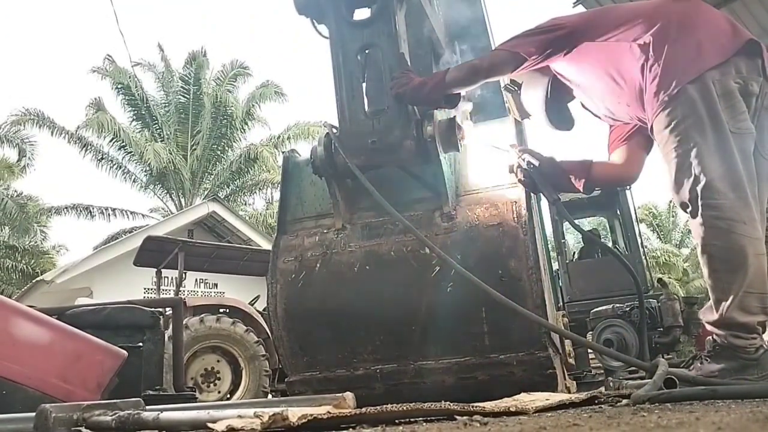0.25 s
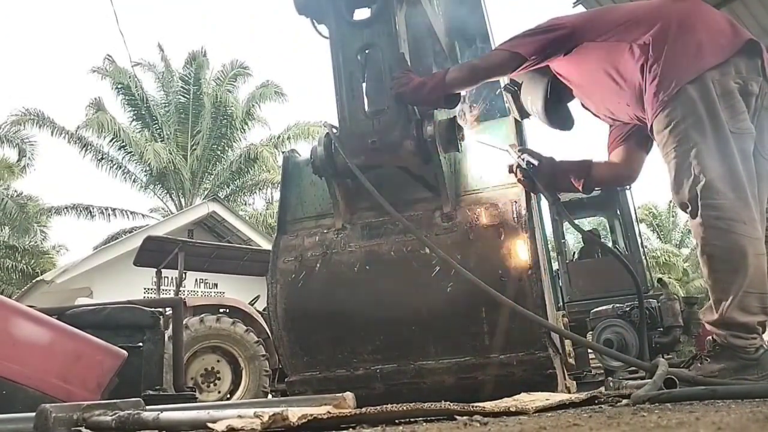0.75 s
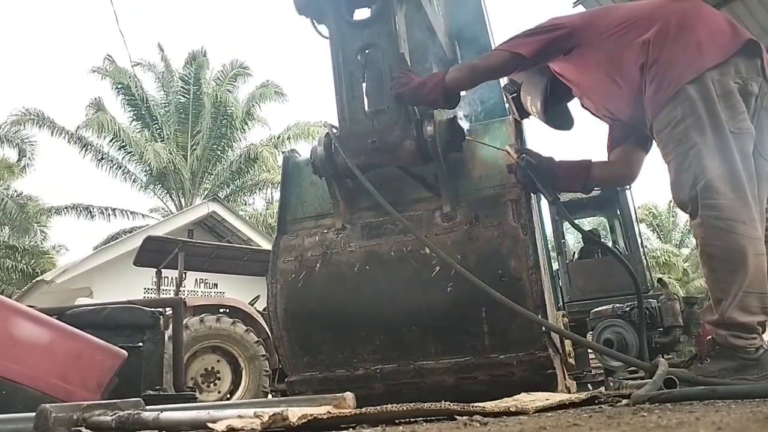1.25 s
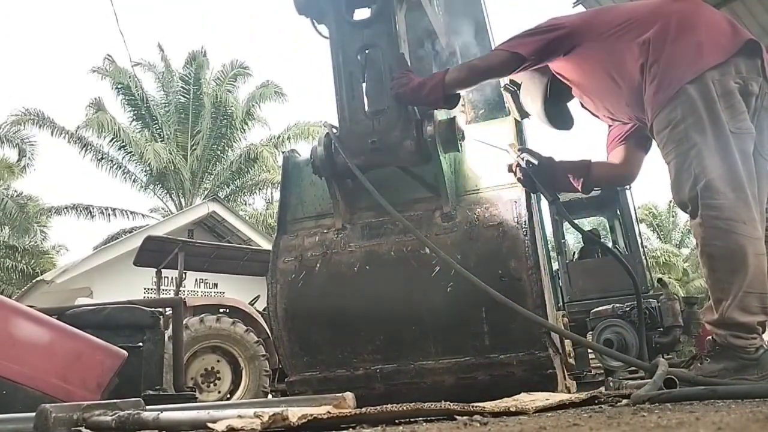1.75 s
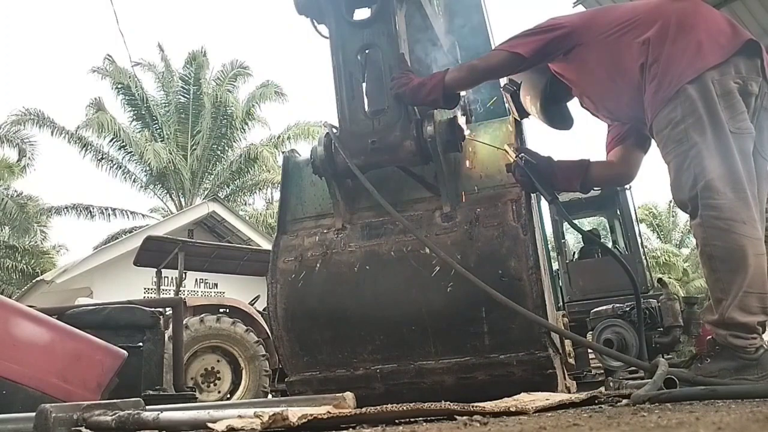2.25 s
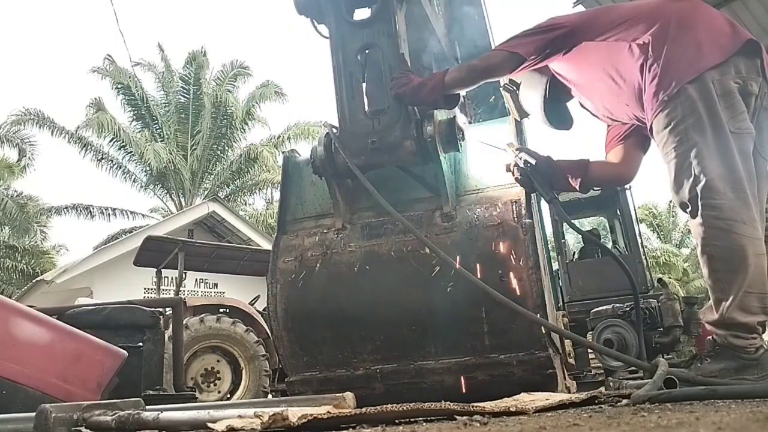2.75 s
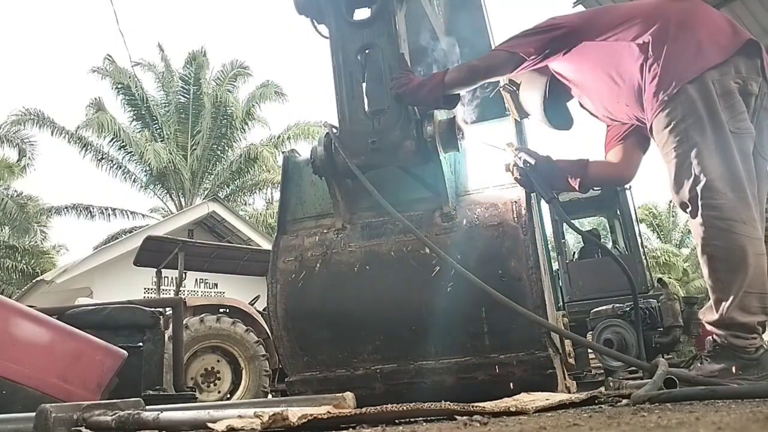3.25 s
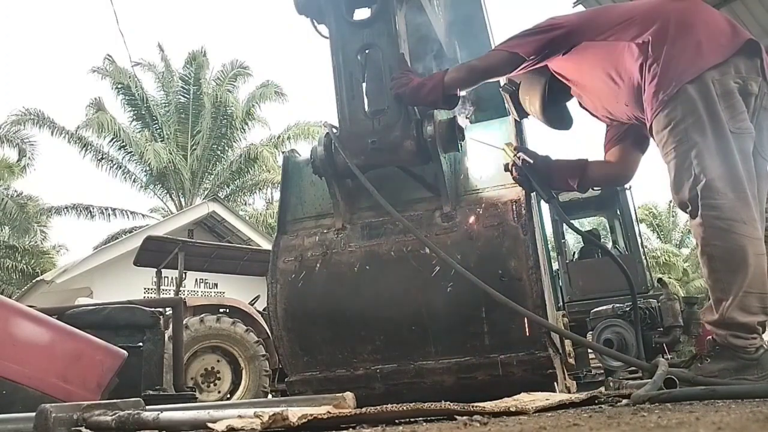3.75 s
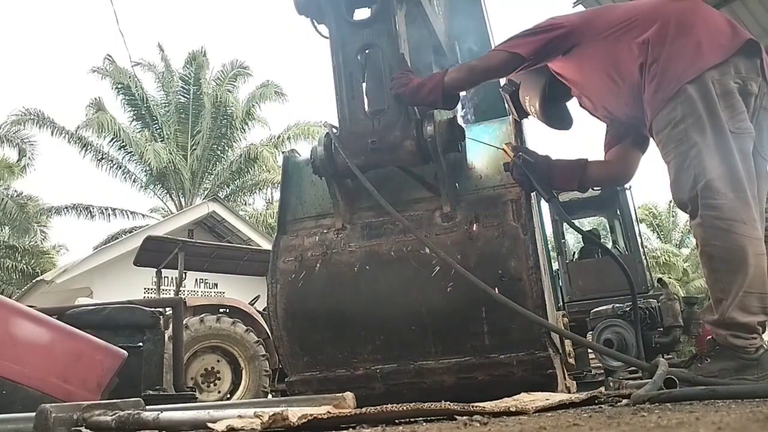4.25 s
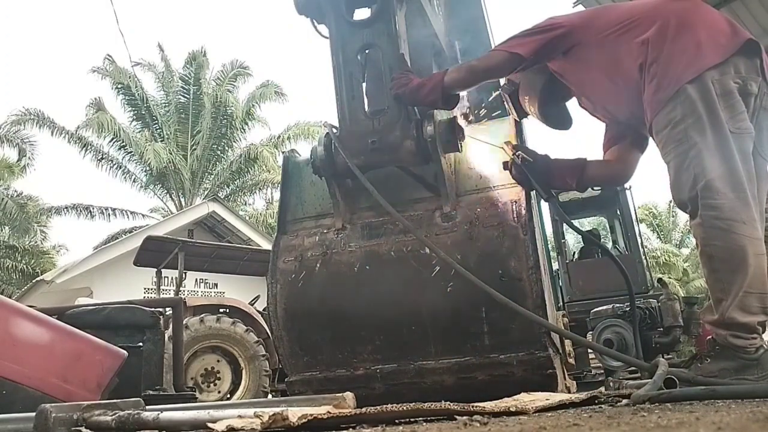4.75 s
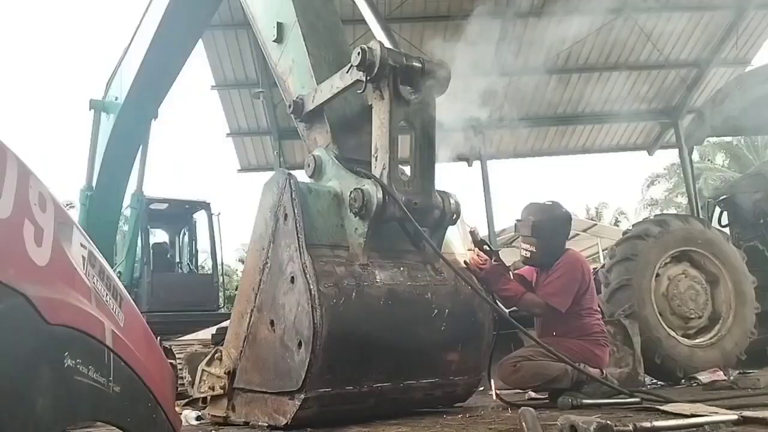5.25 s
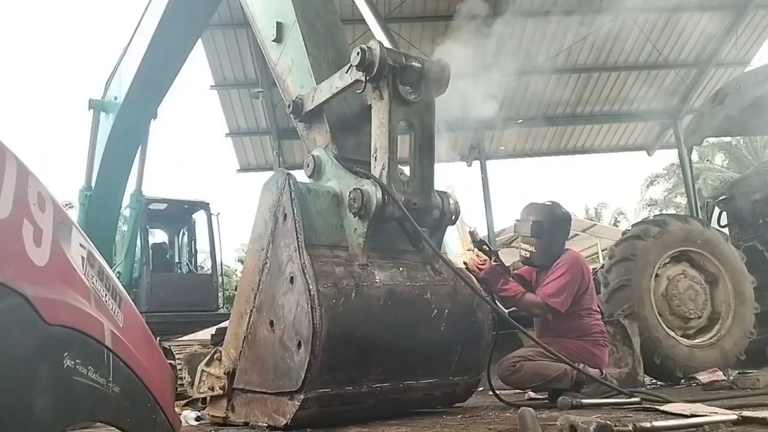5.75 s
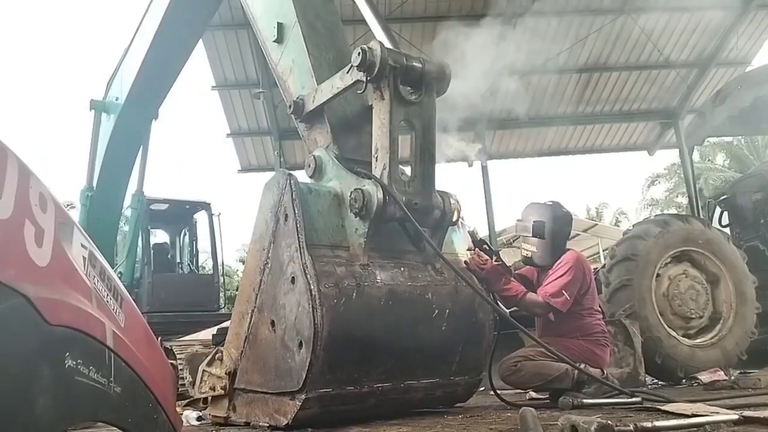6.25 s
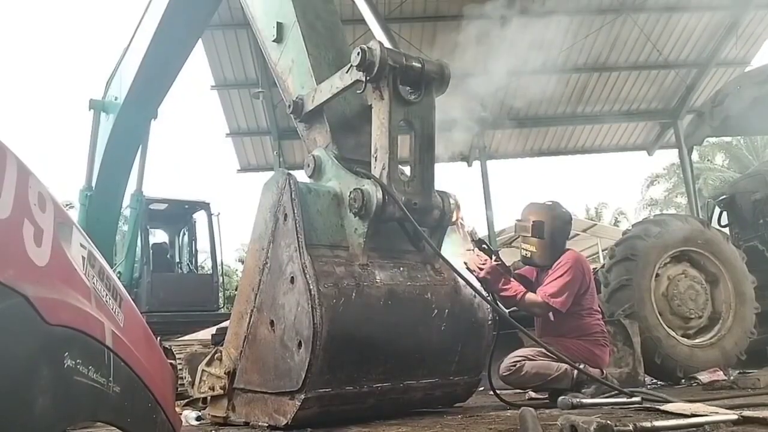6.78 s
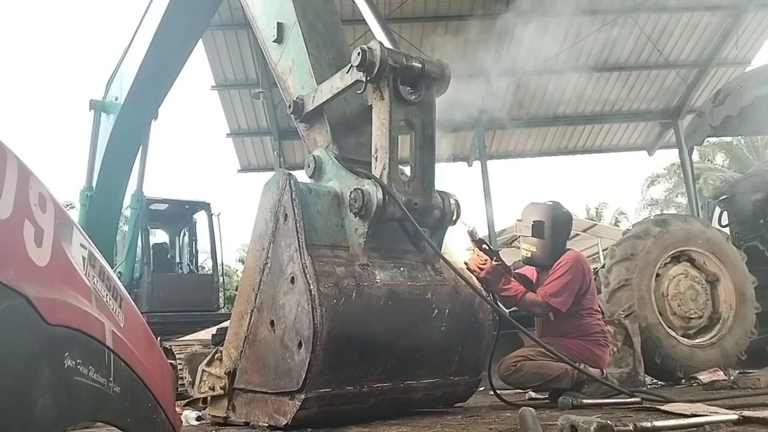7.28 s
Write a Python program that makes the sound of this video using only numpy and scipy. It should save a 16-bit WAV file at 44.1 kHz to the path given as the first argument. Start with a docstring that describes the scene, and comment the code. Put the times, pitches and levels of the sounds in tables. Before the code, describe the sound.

A single-cylinder diesel generator chugs fast and evenly in an open workshop yard, with booming exhaust, metallic knocks and rattling covers. Over it, a stick welder fries and crackles on a steel excavator bucket, with occasional sharp spits. The microphone sits low beside the bucket. After about five seconds everything cuts to a short silence, then engine and welding return from another position, with a low wind rumble.

```python
"""A single-cylinder diesel generator thuds at about 13 firings a second while a stick welder crackles
on a steel bucket. The engine is a set of resonators under periodic impact: each cycle an exhaust puff
booms in the silencer, knocks ring the block and loose covers rattle. The arc fries and spits as shot
noise. The yard is heard low beside the bucket and then, after a short silence, facing the shed,
where a low wind rumbles."""
import sys
import numpy as np
from scipy import signal
from scipy.fft import rfft, irfft
from scipy.io import wavfile
from scipy.ndimage import uniform_filter1d, map_coordinates

SR = 44100
rng = np.random.default_rng(int(sys.argv[2]) if len(sys.argv) > 2 else 0)


def store_wav(level_fs):
    """Save 16-bit WAV to argv[1]."""
    pcm = np.round(np.clip(np.atleast_2d(level_fs), -1, 1) * 32767)
    wavfile.write(sys.argv[1], SR, pcm.T.astype(np.int16))


N = 331632
TIME = np.arange(N) / SR

# Levels in all tables are relative.
# bright crackle of the arc, with the microphone's treble peaks: f/Hz, level/dB
CRACKLE_AT_MIC = [(600, -8.5), (2000, 2), (4200, 2.5), (5000, 3), (6300, 6), (7800, -6.5), (8600, -1.5),
                  (10000, 0), (10800, -5), (11800, 4.5), (12500, -1), (13200, 1.5), (14100, -7.5),
                  (15100, -1)]
# modes of the loose steel parts: f/Hz, level/dB, T60/s
STEEL_MODES = [(3700, -2.5, .06), (3890, -0.5, .06), (4010, -2.5, 0.073), (4204, 2.5, 0.036),
               (4240, -2, 0.092), (4370, 0, 0.055), (4750, -7, 0.059), (5370, -10.5, 0.051),
               (5670, -4.5, .04), (6130, -6.5, .06), (6330, -6.5, 0.057), (6750, -9, .05), (7020, -13, .05),
               (8600, -13, 0.047), (9990, -16, 0.015), (11730, -16.5, .04)]
# hard jolts of the loose steel: t/s, level/dB
HARD_JOLTS = [(0.725, -37.5), (0.8026, -34), (0.9587, -34), (0.9834, -34), (1.8936, -35), (1.92, -33),
              (2.2314, -38), (2.3131, -39), (3.0116, -35), (3.7117, -31), (3.922, -38), (5.125, -40),
              (5.8554, -27), (6.1664, -39), (6.1886, -31), (6.3445, -32), (6.7366, -37), (7.204, -36)]


def undb(db):
    """Amplitude grows tenfold with every 20 dB."""
    return 10 ** (np.asarray(db) / 20)


def unit(x):
    """Normalisation to an rms of 1."""
    return x / np.sqrt(np.mean(x ** 2))


def colour(x, points, size=4096):
    """Minimum-phase filtering: a folded cepstrum makes the response (f/Hz, level/dB) causal."""
    hz, db = np.transpose(points)
    bins = np.maximum(np.fft.rfftfreq(size, 1 / SR), 1)
    gain = undb(np.interp(np.log(bins), np.log(hz), db))
    cepstrum = irfft(np.log(gain))
    cepstrum[1:size // 2] *= 2
    cepstrum[size // 2 + 1:] = 0
    return signal.fftconvolve(x, irfft(np.exp(rfft(cepstrum))))[:N]


def butter(x, hz, kind, order=2):
    """Butterworth filtering, with a maximally flat passband."""
    return signal.sosfilt(signal.butter(order, hz, kind, fs=SR, output="sos"), x)


def pulses(times, sizes):
    """Impulse excitation: each brief event lasts one sample."""
    at = np.round(times * SR).astype(int)
    inside = (at >= 0) & (at < N)
    return np.bincount(at[inside], (sizes * np.ones(len(at)))[inside], N)


def fade(x, decay_s):
    """Exponential relaxation gives every impulse a tail."""
    return signal.lfilter([1], [1, -np.exp(-1 / (decay_s * SR))], x)


def ring(x, modes, flip=1):
    """Modal superposition of damped sines; a negative flip puts neighbours in antiphase."""
    t = np.arange(SR // 3) / SR
    response = sum(flip ** k * undb(db) * np.sin(2 * np.pi * hz * t) * np.exp(-np.log(1000) * t / t60)
                   for k, (hz, db, t60) in enumerate(modes))
    return signal.fftconvolve(x, response)[:N]


def yard(x, echo_db=-6, spread_s=.016, count=12):
    """Interference with early echoes off the ground and nearby steel combs the spectrum."""
    place, size = rng.uniform(-1, 1, (count, 2)).T
    echoes = pulses(.0015 + spread_s * place ** 2, size * undb(echo_db) / np.linalg.norm(size))
    return (x + signal.fftconvolve(x, echoes[:SR // 10])[:N]) / np.hypot(1, undb(echo_db))


def arc(snaps_per_s, spread_db=7, burst_s=.0013, fry=.65, waver_db=1.74, wavers_per_s=6.5):
    """Shot noise: droplets short the arc at random, in snaps over an even frying."""
    when, chance = rng.random((int(snaps_per_s * N / SR), 2)).T
    sizes = undb(spread_db * np.minimum(-np.log(1 - chance), 2.85))  # many small, few large
    power = fade(pulses(when * N / SR, sizes ** 2), burst_s)
    envelope = np.sqrt(power / power.mean() + fry)
    crackle = unit(colour(yard(envelope * rng.standard_normal(N)), CRACKLE_AT_MIC))
    # the arc length wavers in the welder's hand
    waver = map_coordinates(rng.standard_normal(256), [TIME * wavers_per_s], mode="mirror")
    return crackle * undb(waver_db * waver)


def spits(gain_db=.4, burst_s=.002, tail_s=.01, tail_db=-22):
    """Broadband transients: beads of molten metal burst; steel and ground scatter a short tail."""
    # bursting beads: t/s, level/dB
    beads = [(0.2208, -37), (0.746, -40), (0.847, -38), (0.999, -39), (1.2185, -40), (2.074, -32),
             (2.6402, -34.5), (3.021, -40), (3.715, -42), (3.754, -42), (4.006, -38), (4.281, -39.5),
             (4.788, -30), (4.8007, -35), (5.2, -42), (5.23, -38), (6.361, -40), (6.704, -37)]
    times, db = np.transpose(beads)
    hits = pulses(times, undb(db + gain_db))
    envelope = fade(hits, burst_s) + undb(tail_db) * fade(hits, tail_s)
    return colour(butter(envelope * rng.standard_normal(N), 6900, "high", order=1), CRACKLE_AT_MIC)


def jolts(gain_db=-16, bounce_s=.006):
    """Noise-burst excitation: now and then the loose steel jumps harder and chatters in its modes."""
    times, db = np.transpose(HARD_JOLTS)
    chatter = fade(pulses(times, undb(db + gain_db)), bounce_s) * rng.standard_normal(N)
    return ring(chatter / np.sqrt(bounce_s * SR / 2), STEEL_MODES)


def liveliness(reach_s=.09):
    """Slow modulation, 0 to 1: the shaking builds before each hard jolt and dies down after it."""
    nearness = sum(np.exp(-.5 * ((TIME - at_s) / reach_s) ** 2) for at_s, _ in HARD_JOLTS)
    return np.tanh(nearness)


def tinks(fired, bursts, scatter_db=3.5, bounces=3):
    """Repeated impact: shaken steel bounces, and each contact favours other modes."""
    times, sizes = [], []
    for delay, db, decay_s in bursts:
        lag_s = .6 * decay_s * rng.exponential(size=(len(fired), bounces))
        times.append((fired[:, None] + delay + lag_s).ravel())
        sizes.append(undb(db + scatter_db * rng.standard_normal(lag_s.size)))
    times, sizes = np.concatenate(times), np.concatenate(sizes)
    return unit(sum(ring(pulses(times, sizes * rng.standard_normal(len(times))), [mode])
                    for mode in STEEL_MODES))


def valve(fired, delay_s, db, scatter_db=1.5, jitter_s=.0003):
    """Impact across a clearance: a rocker takes up its slack with a small pitched tick."""
    # modes of the valve gear: f/Hz, level/dB, T60/s
    modes = [(4260, -0.5, .07), (5800, -11, .025), (6180, -8, .04)]
    late, strong = rng.standard_normal((2, len(fired)))
    return ring(pulses(fired + delay_s + jitter_s * late, undb(db + scatter_db * strong)), modes)


def shaking(fired, bursts, scatter_db=2.5, rise_s=.0006):
    """Incoherent sources add in power: the envelope of parts jolted a few times a cycle."""
    power = 1
    for delay, db, decay_s in bursts:
        sizes = undb(db + scatter_db * rng.standard_normal(len(fired)))
        power = power + fade(pulses(fired + delay, sizes ** 2), decay_s)
    return unit(np.sqrt(uniform_filter1d(power, int(rise_s * SR))))


def turning(fired, repeat_share=.38, from_hz=260, to_hz=2000):
    """Cyclic noise of moving parts: some of the midrange repeats each cycle, the rest is fresh."""
    size = int(np.diff(fired).mean() * SR)
    fresh = rng.standard_normal(N)
    turn = unit(irfft(np.exp(2j * np.pi * rng.random(size // 2 + 1))))
    starts = np.round(np.append(fired[0] - size / SR, fired) * SR).astype(int)
    n, hz = np.arange(N), np.fft.rfftfreq(N, 1 / SR)
    since_firing = n - starts[np.searchsorted(starts, n, "right") - 1]
    repeated = turn[since_firing % len(turn)]
    share = repeat_share * (hz > from_hz) / np.hypot(1, hz / to_hz)
    return irfft(np.sqrt(share) * rfft(repeated) + np.sqrt(1 - share) * rfft(fresh), N)


def clatter(fired, spectrum, covers, bursts, treble_db, split_hz=2600, width_hz=18):
    """Amplitude modulation: the low rush is almost even; treble and thin covers follow the shaking."""
    shake = shaking(fired, bursts)
    noise = turning(fired) * np.sqrt(SR / 2)
    low = butter(noise, split_hz, "low", order=3) * unit(shake ** .3)
    high = butter(noise, split_hz, "high", order=3) * unit(shake ** .71) * undb(treble_db)
    taps = rng.standard_normal(N) * shake
    singing = sum(undb(db) * unit(signal.lfilter(*signal.iirpeak(hz, hz / width_hz, SR), taps))
                  for hz, db in covers)
    return colour(low + yard(high), spectrum) + singing


def rattle(fired, heard, spectrum, covers, bursts, rush_db, tink_db, treble_swell_db=1.25, swell_db=5):
    """Common modulation: around hard jolts the tinks swell, and the treble of the rush less so."""
    lively = liveliness()
    lively -= lively[heard].mean()
    rush = undb(rush_db) * clatter(fired, spectrum, covers, bursts, treble_swell_db * lively)
    return rush + undb(tink_db + swell_db * lively) * tinks(fired, bursts)


def combustion(fired, stages):
    """Impulse response to sudden ignition: a short, dry bark, then a clank from the cylinder."""
    return sum(ring(pulses(fired + delay_s, undb(db)), [(hz, 0, t60_s)])
               for delay_s, hz, db, t60_s in stages)


def block(fired, knocks, modes, scatter_db=.6, jitter_s=.00005):
    """Forced vibration: piston and valves knock the block; harder contact reaches higher modes."""
    force = 0
    for delay, db, cutoff_hz in knocks:
        late, strong = rng.standard_normal((len(fired), 2)).T
        hits = pulses(fired + delay + jitter_s * late, undb(db + scatter_db * strong))
        force = force + butter(hits, cutoff_hz, "low", order=1)
    return butter(ring(force, modes, flip=-1.0044), 60, "high", order=1)


def exhaust(fired, modes, lead_s=.0016, scatter_db=.06):
    """Cavity resonance: one puff a cycle booms in the silencer."""
    puffs = pulses(fired - lead_s, undb(scatter_db * rng.standard_normal(len(fired))))
    return -butter(ring(puffs, modes), 30, "high")


def firings(speed, first_s):
    """Phase is the integral of frequency: the engine fires at each whole cycle."""
    cycles = np.cumsum(np.interp(TIME, *np.transpose(speed))) / SR
    cycles -= np.interp(first_s, TIME, cycles)
    return np.interp(np.arange(np.ceil(cycles[0]), cycles[-1]), cycles, TIME)


def beside_bucket(end_s=5.2955):
    """Superposition of generator and arc at a point low beside the bucket."""
    # governed firing rate: t/s, f/Hz
    speed = [(.22, 12.809), (.61, 12.75), (1.35, 12.846), (1.85, 12.784), (2.8, 12.8), (3.7, 12.777),
             (4.25, 12.852), (4.9, 12.803)]
    # silencer modes: f/Hz, level/dB, T60/s
    silencer = [(82.3, -23.5, 0.35), (113.5, -25.5, 0.19), (178.6, -41, 0.22), (110, -29, 0.017)]
    # piston and valve knocks: t/s after firing, level/dB, cutoff f/Hz
    knocks = [(-0.00166, -11.5, 2420), (0.0186, 6, 274), (0.0321, -15.5, 2235), (0.0443, -5, 384),
              (0.0577, -4, 513)]
    # block and frame modes: f/Hz, level/dB, T60/s
    modes = [(200.3, -36, 0.24), (202.2, -34, 0.18), (196, -28, 0.011), (259, -40, 0.2),
             (396.2, -21, 0.033), (344.5, -29.5, 0.1), (406.9, -31.5, 0.24), (410.8, -21, 0.082),
             (444, -39, 0.12), (508, -31.5, 0.094), (515, -40, 0.208), (549.2, -42, 0.38), (616, -43, 0.09),
             (614.6, -23, 0.022), (700, -49, 0.56), (806, -36, 0.41), (804.6, -30, 0.17),
             (967.3, -41, 0.27), (981.5, -35.5, 0.237), (996.4, -25.5, 0.082), (1155, -26.5, 0.215),
             (1160, -25.5, 0.22), (1266, -27.5, 0.042), (1291, -28, 0.29), (1291, -27.5, 0.14),
             (1460, -44, 0.21)]
    # rush of fan, gas and clatter: f/Hz, level/dB
    rush = [(25, -79.5), (120, -65.5), (420, -65.5), (720, -68.5), (1000, -69), (1280, -67), (1360, -73.5),
            (1900, -80), (2600, -82.5), (4250, -83.5), (4800, -94), (6400, -93.5), (7800, -102),
            (15000, -108)]
    # thin cover resonances: f/Hz, level/dB
    covers = [(1405, -65), (1470, -60), (2100, -74.5), (2365, -68), (2880, -66), (2960, -63.5), (3208, -62),
              (3400, -69), (3580, -64.5), (3758, -75), (4802, -72)]
    # rattle bursts: t/s after firing, level/dB, decay time/s
    bursts = [(-.001, 3, 0.0053), (0.021, 2, 0.011), (0.043, -12, .007)]
    # combustion bark and clank: t/s after firing, f/Hz, level/dB, T60/s
    crack = [(.0178, 540, -28, 0.0095), (.0208, 1120, -31.5, .008)]
    heard = TIME < end_s
    fired = firings(speed, first_s=.0206)
    engine = undb(-1.13) * exhaust(fired, silencer) + undb(-.6) * block(fired, knocks, modes)
    engine += rattle(fired, heard, rush, covers, bursts, rush_db=.32, tink_db=-56.5)
    engine += combustion(fired, crack) + valve(fired, delay_s=.0235, db=-50)
    return heard * (engine + undb(-56) * arc(snaps_per_s=220))


def facing_shed(start_s=5.7515, end_s=7.6, opening_db=5, settle_s=.45):
    """Superposition of generator, arc and wind facing the shed; the level starts high and settles."""
    # governed firing rate: t/s, f/Hz
    speed = [(5.98, 12.843), (7, 12.785)]
    # silencer modes: f/Hz, level/dB, T60/s
    silencer = [(85.8, -28.5, 0.27), (110.4, -28.5, 0.45), (147.6, -30.5, 0.084), (100, -30, .014)]
    # piston and valve knocks: t/s after firing, level/dB, cutoff f/Hz
    knocks = [(-0.00356, 1.5, 238), (0.0185, 6.5, 408), (0.0284, -14, 4149), (0.04215, -7, 3573),
              (0.059, -4.5, 1310)]
    # block and frame modes: f/Hz, level/dB, T60/s
    modes = [(187.2, -20.5, 0.251), (187, -20.5, 0.218), (296, -30.5, 0.09), (299.4, -35.5, 0.23),
             (337, -33, 0.082), (348.6, -32.5, 0.096), (408, -31.5, 0.13), (546, -38, 0.23),
             (578, -47.5, 0.21), (604, -28, 0.064), (605, -20, 0.02), (704, -32.5, 0.15),
             (698.5, -31, 0.15), (795, -58, 0.12), (840, -29.5, 0.057), (841, -31, 0.081),
             (900.6, -36.5, 0.11), (966, -20.5, 0.024), (970, -32.5, 0.39), (1020, -37, 0.24),
             (1019, -20.5, 0.052), (1173.4, -24, 0.1), (1180.4, -31.5, 0.14), (1207, -31.5, 0.17),
             (1268, -28.5, 0.036), (1380, -33, 0.01)]
    # low wind rumble, with the engine's rush and clatter: f/Hz, level/dB
    wind_and_rush = [(28, -65), (52, -54.5), (75, -63), (120, -59), (220, -67), (720, -68.5), (960, -64),
                     (1300, -68), (1900, -79.5), (3300, -82), (4250, -79.5), (4800, -88.5), (6400, -93),
                     (7800, -97), (15000, -104)]
    # thin cover resonances: f/Hz, level/dB
    covers = [(1605, -54.5), (2369, -64), (2963, -60), (3205, -68)]
    # rattle bursts: t/s after firing, level/dB, decay time/s
    bursts = [(-.003, 7.5, 0.003), (0.018, 3.5, 0.0089), (.042, -8, 0.0073)]
    # combustion bark and clank: t/s after firing, f/Hz, level/dB, T60/s
    crack = [(.0172, 535, -28, 0.0079), (.0193, 1140, -28, .013)]
    heard = (TIME >= start_s) & (TIME < end_s)
    fired = firings(speed, first_s=5.7806)
    mix = undb(-1.5) * exhaust(fired, silencer) + undb(-1.3) * block(fired, knocks, modes)
    mix += rattle(fired, heard, wind_and_rush, covers, bursts, rush_db=-1, tink_db=-54.5)
    mix += combustion(fired, crack) + valve(fired, delay_s=.0175, db=-43.5)
    settling = undb(opening_db * np.exp(-np.maximum(TIME - start_s, 0) / settle_s))
    return heard * settling * (mix + undb(-52.5) * arc(snaps_per_s=400))


def scene():
    """Pressures add: the two listening points in turn, with the hard jolts and spits on top."""
    return (beside_bucket() + facing_shed() + jolts() + spits())[None]


def record(dry, bass_hz=25, top_hz=15450):
    """Band limiting: the microphone loses the deepest bass and the very top."""
    bass_cut = butter(dry, bass_hz, "high", order=1)
    return signal.sosfilt(signal.ellip(12, .2, 80, top_hz, fs=SR, output="sos"), bass_cut)


dry = scene()
out = record(dry)
store_wav(out)
```